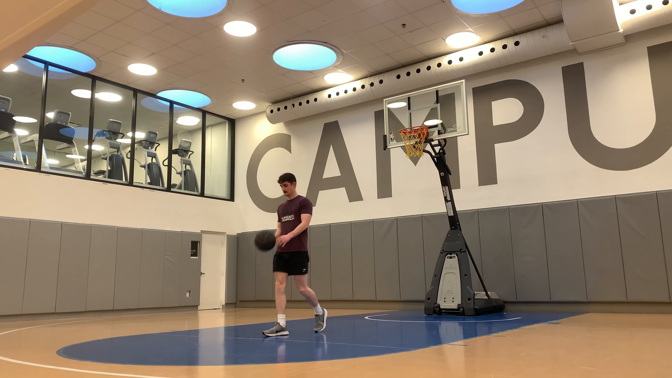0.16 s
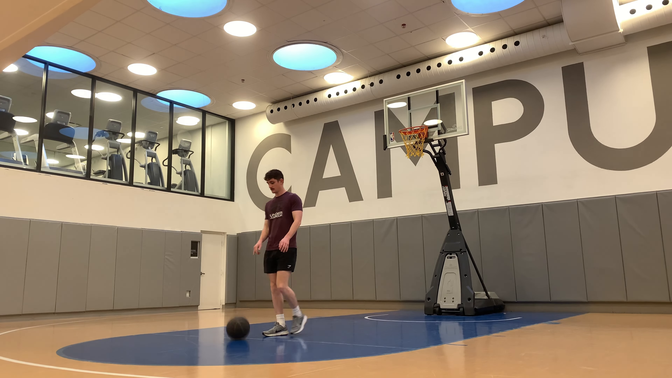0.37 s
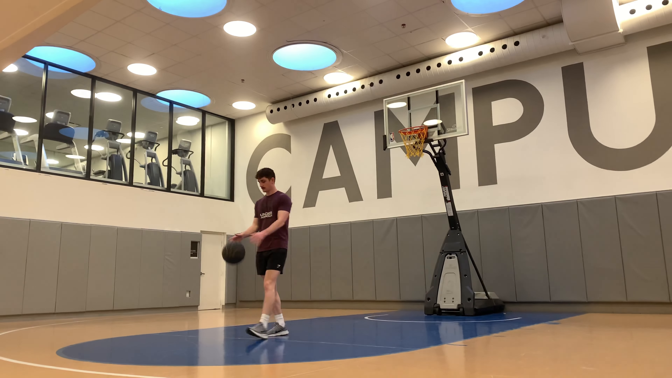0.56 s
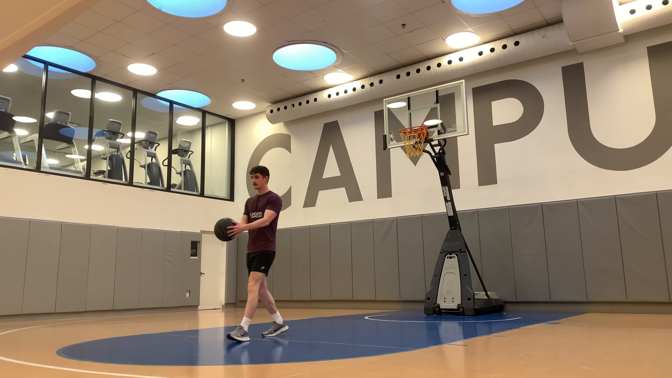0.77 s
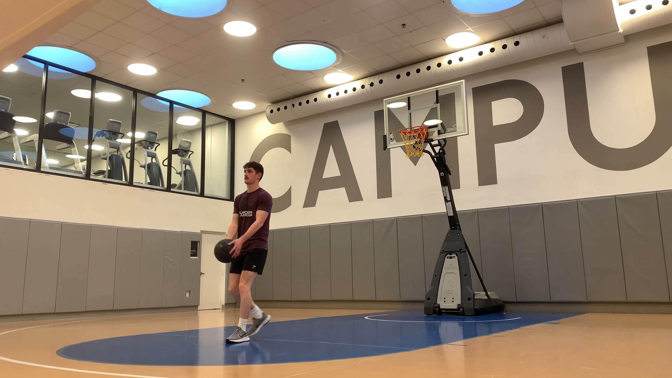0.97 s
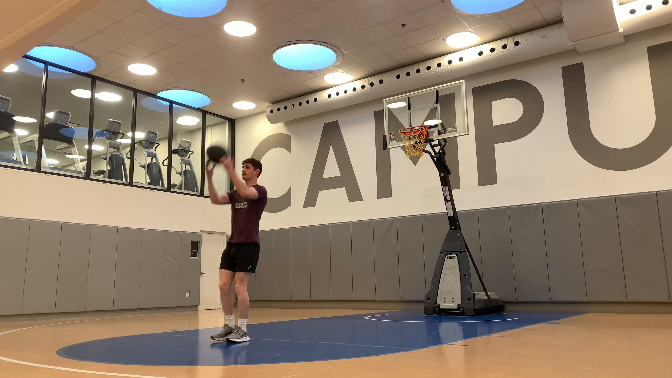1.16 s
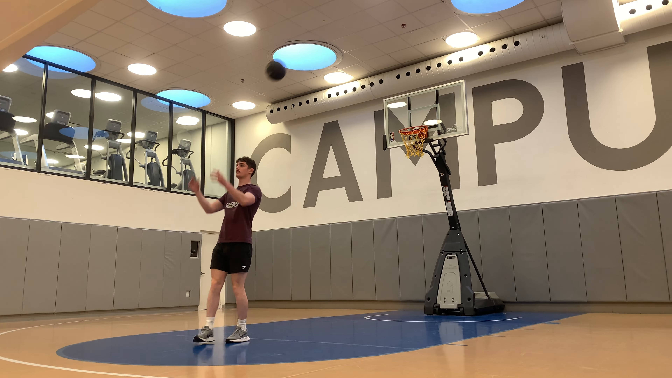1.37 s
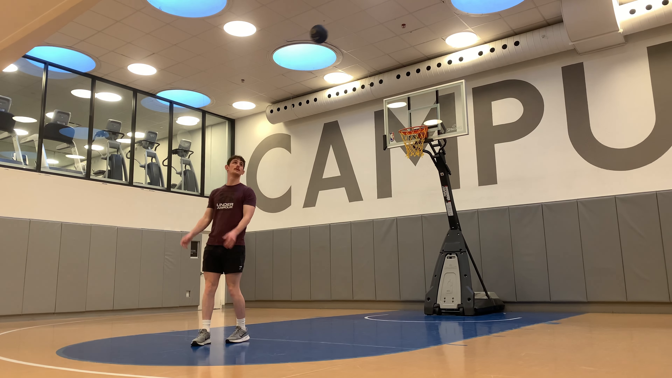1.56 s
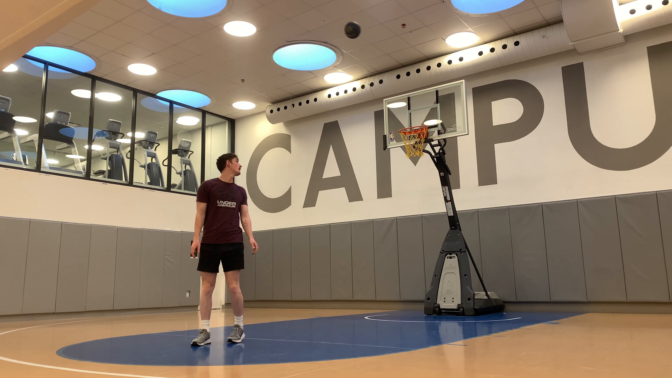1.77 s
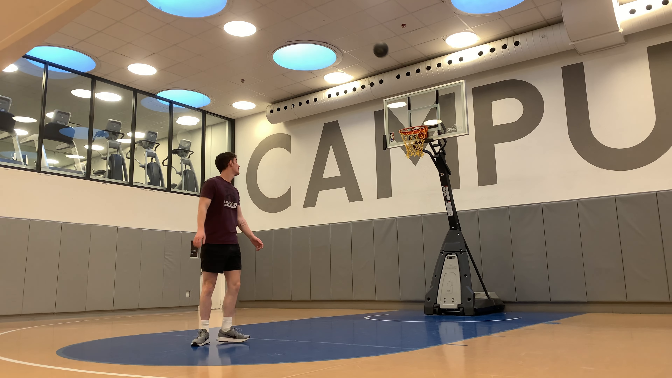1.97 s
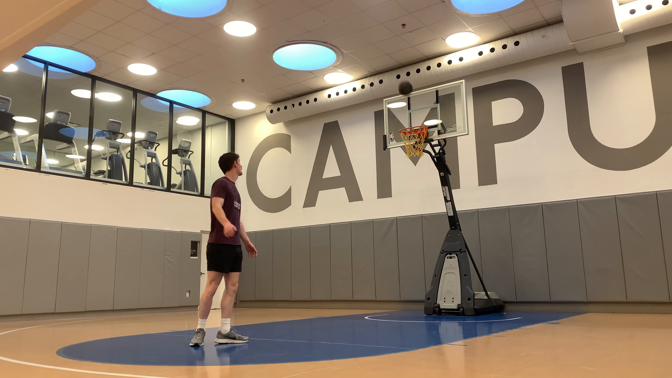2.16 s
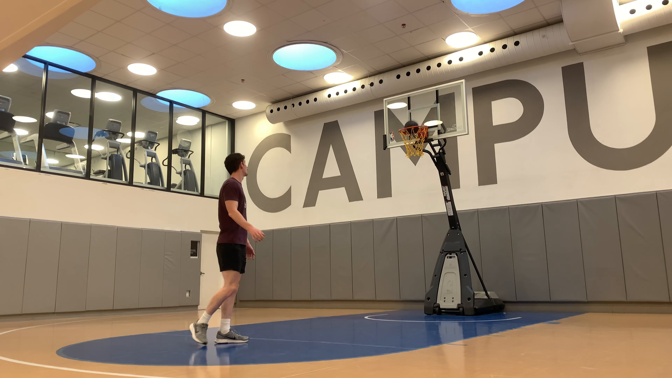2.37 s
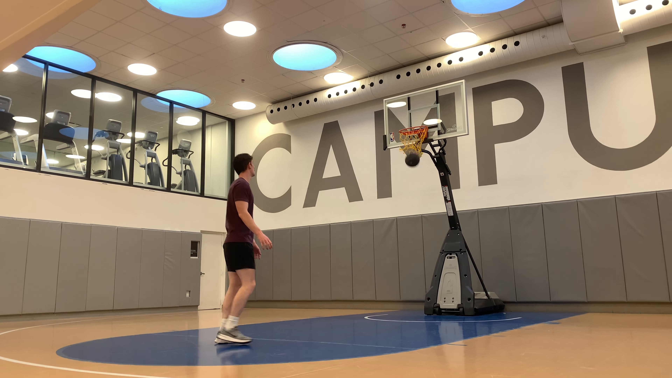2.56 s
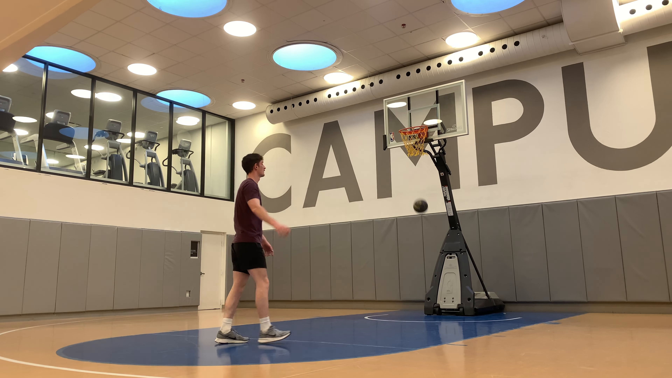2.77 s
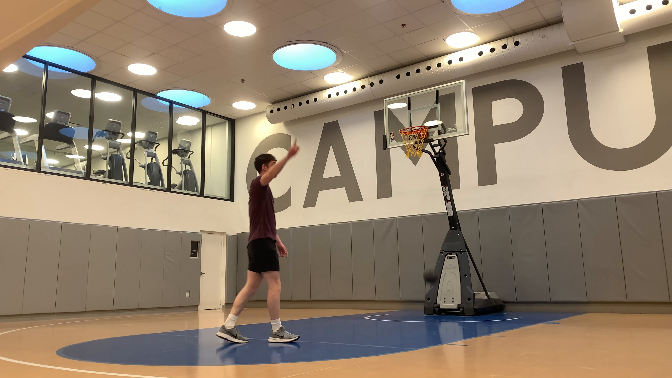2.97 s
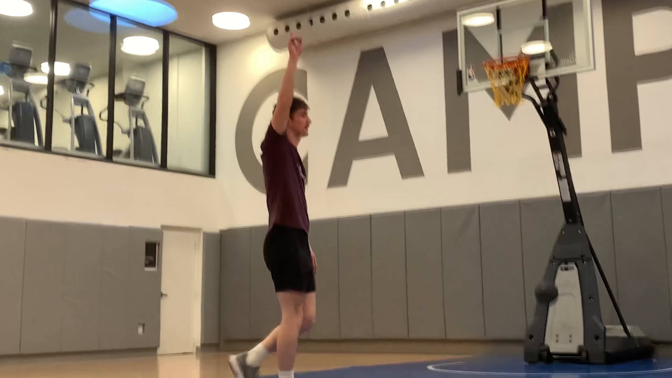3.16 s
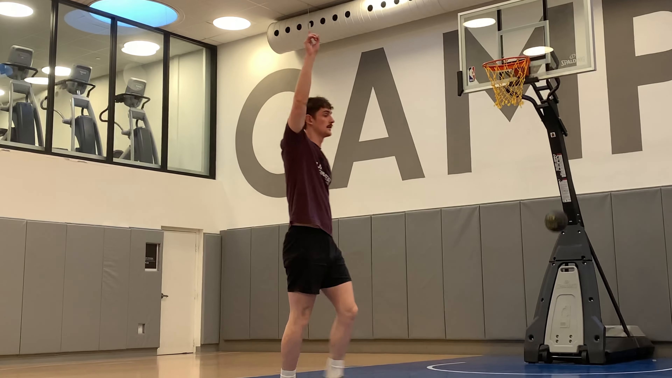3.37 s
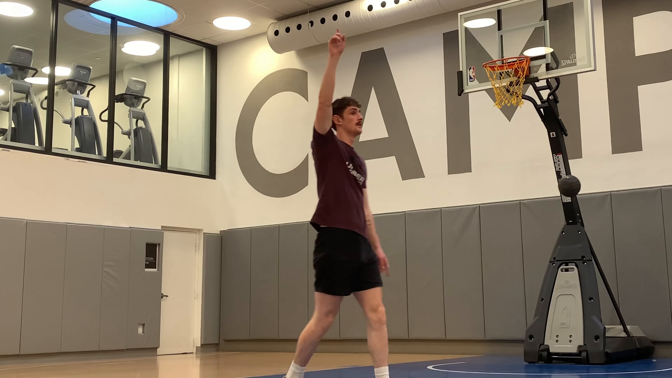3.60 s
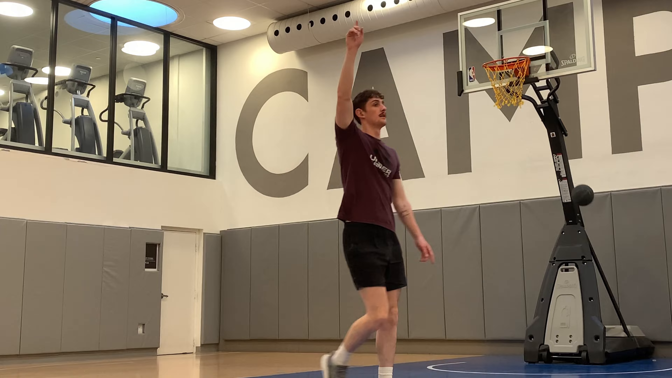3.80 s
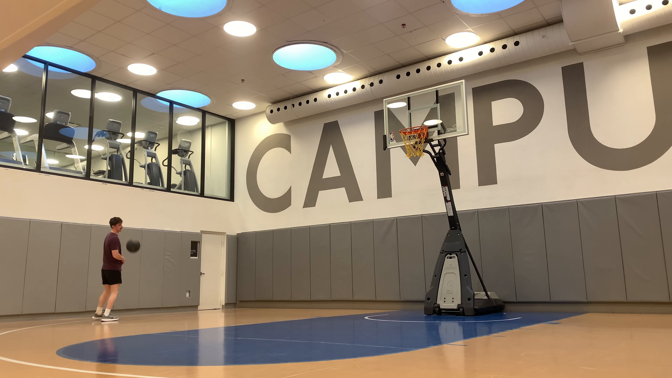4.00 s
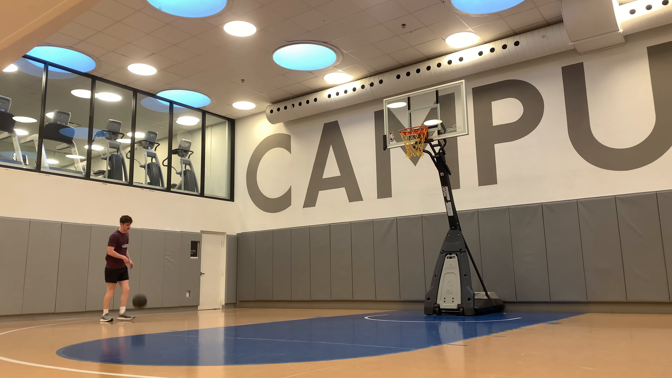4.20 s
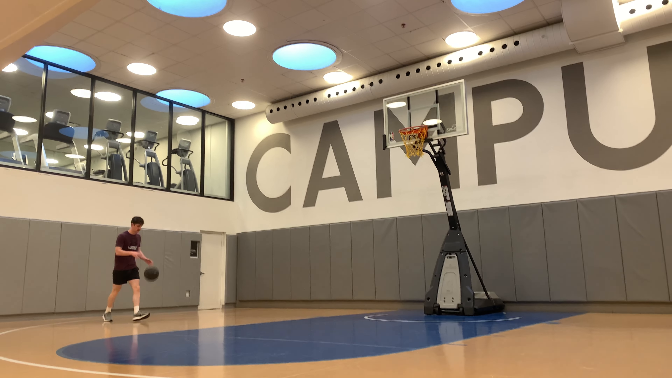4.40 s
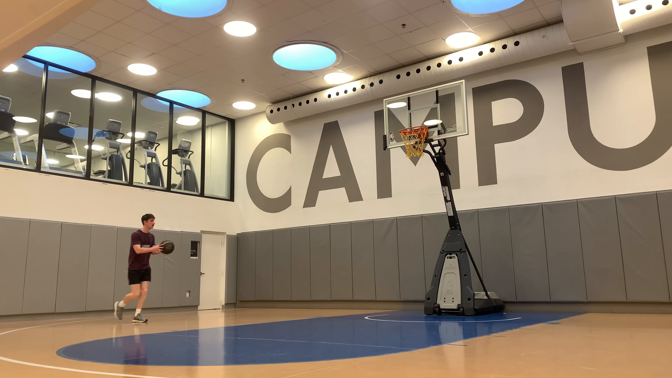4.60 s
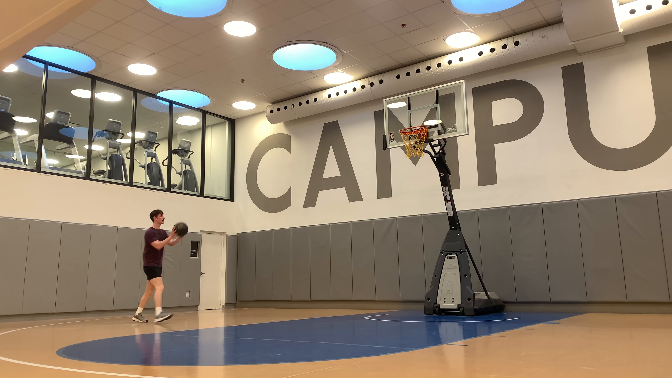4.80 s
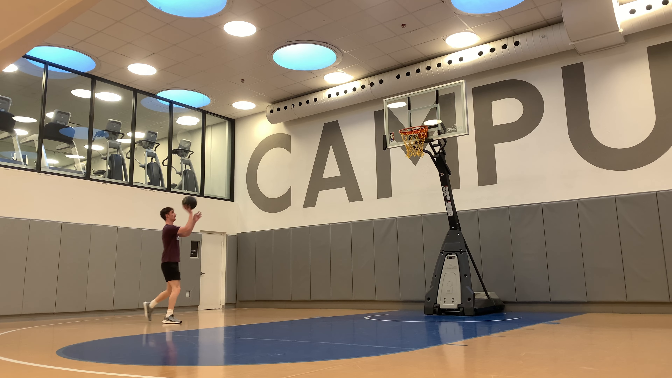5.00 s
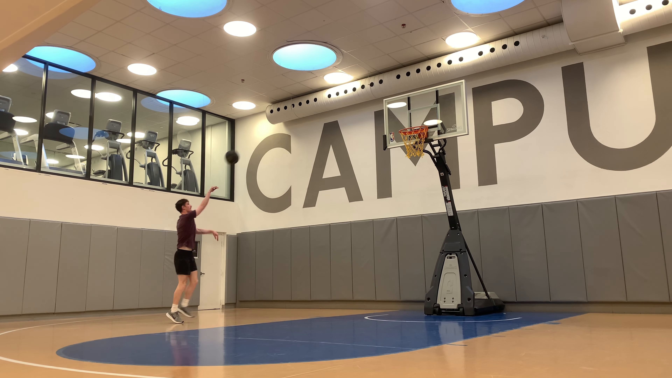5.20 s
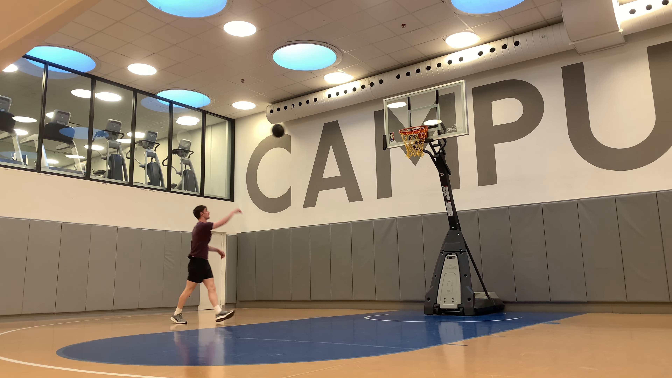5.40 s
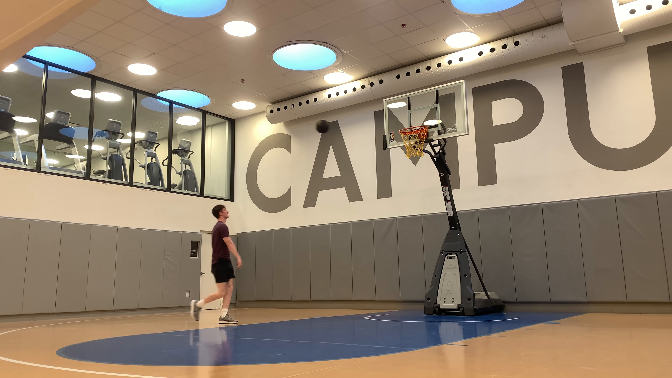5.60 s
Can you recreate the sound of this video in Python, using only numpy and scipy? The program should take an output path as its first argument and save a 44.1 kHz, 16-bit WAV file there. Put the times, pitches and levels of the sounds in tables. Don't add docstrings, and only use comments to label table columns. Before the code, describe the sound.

Stereo phone pickup in a large, hard-walled sports hall with low ventilation rumble. An earlier bounce is still ringing as one dribble slaps the boards; faint shoe taps, a quick clattering run on glass backboard and rim, a tiny net swish, a heavy floor bounce and short shoe squeaks. The scene cuts, echo still hanging, to one more resonant dribble and light foot taps.

```python
import sys
import numpy as np
from scipy import signal
from scipy.fft import rfft, irfft, next_fast_len
from scipy.io import wavfile
from scipy.ndimage import uniform_filter1d

SR = 44100
rng = np.random.default_rng(int(sys.argv[2]) if len(sys.argv) > 2 else 0)


def decibels_to_gain(level_db):
    exponent = np.asarray(level_db, float) / 20
    return 10 ** exponent


def persist_wave(psi):
    counts = np.round(np.clip(psi, -1, 1) * 32767).astype(np.int16)
    wavfile.write(sys.argv[1], SR, np.atleast_2d(counts).T)


N = 249165
TAIL = 2 ** 16
CHANGE_S = 3.935


def colour(points, tilt_db=0.):
    hz, db = np.transpose(points)
    octave = np.log2(np.maximum(np.fft.rfftfreq(4096, 1 / SR), 10))
    level_db = np.interp(octave, np.log2(hz), db) + tilt_db * (octave - 9)
    cepstrum = irfft(np.log(decibels_to_gain(level_db)))
    cepstrum[1:2048] *= 2
    cepstrum[2049:] = 0
    return irfft(np.exp(rfft(cepstrum)))[:2048]


def walk(rate):
    hold = int(SR / rate)
    steps = np.repeat(rng.standard_normal(N // hold + 1), hold)
    return uniform_filter1d(uniform_filter1d(steps, hold), hold)[:N]


def bands(x):
    size = x.shape[-1]
    octave = np.log2(np.fft.rfftfreq(size, 1 / SR) + 1)
    spectrum = rfft(x)
    for centre in np.arange(4.5, 14.5, .5):
        yield 2 ** centre, irfft(spectrum * np.clip(1 - 2 * abs(octave - centre), 0, 1), size)


def hall(delays, metres, wall_db):
    # f/Hz, t60/s, straight sound against tail/dB
    decay = [(41, 1.2, -23.5), (110.8, 1.626, -17), (410, 1.13, -12.5), (1950, 1.367, -15),
             (4435, 1.033, -17.5), (7700, 0.55, -8), (11500, .34, -1), (16100, .13, 3)]
    scatter_s = 0.00039
    build_up_s, build_up_slope = 0.0057, 0.78
    throb, throb_hz, throb_s = 0.89, 70, 0.1218
    t = np.arange(TAIL) / SR
    decay_hz, decay_t60, straight_db = np.transpose(decay)
    straight = colour(np.transpose([decay_hz, straight_db]))

    early = np.zeros(TAIL)
    for s in delays:
        smear = rng.standard_normal(128) * np.exp(-t[:128] / scatter_s)
        smear /= np.sqrt(np.sum(smear ** 2))
        spreading = metres / (metres + 343 * s)
        early[int(SR * s):][:len(smear)] += decibels_to_gain(wall_db) * spreading * smear

    tail = np.zeros((2, TAIL))
    for hz, noise in bands(rng.standard_normal((2, TAIL))):
        t60 = np.interp(np.log(hz), np.log(decay_hz), decay_t60)
        rise = build_up_s * (hz / 1000) ** build_up_slope
        shape = (1 - np.exp(-t / rise)) * np.exp(-np.log(1000) * t / t60)
        depth = throb / (1 + (hz / throb_hz) ** 2)
        shape *= 1 + depth * np.cos(2 * np.pi * (t - .025) / throb_s)
        tail += noise * shape / np.sqrt(np.sum(shape ** 2))
    return straight, tail + signal.fftconvolve(early, straight)[:TAIL]


def heard(dry, room, db, straight_db):
    straight, tail = room
    paths = tail.copy()
    paths[:, :len(straight)] += decibels_to_gain(straight_db) * straight
    wet = signal.fftconvolve(paths, dry[None], axes=1)
    return wet * decibels_to_gain(db) / np.sqrt(np.mean(wet[:, :int(.3 * SR)] ** 2))


def add(out, sound, s, late):
    change = int(CHANGE_S * SR)
    first, last = (change, N) if late else (0, change)
    start = int(round(s * SR))
    a, b = max(start, first), min(start + sound.shape[1], last)
    out[:, a:b] += sound[:, a - start:b - start]


def ring(modes):
    t = np.arange(TAIL // 4) / SR
    tune = 1 + 0.013 * rng.standard_normal(16)
    out = (t == 0).astype(float)
    for (hz, db, t60), k in zip(modes, tune):
        out += decibels_to_gain(db) * np.sin(2 * np.pi * hz * k * t) * np.exp(-np.log(1000) * t / t60)
    return out


def blow(points, modes, tilt_db):
    squash_s, squash_hz = 0.001862, 378
    hit = signal.fftconvolve(colour(points, tilt_db), ring(modes))[:TAIL // 4]
    bins = np.fft.rfftfreq(TAIL // 2, 1 / SR)
    lag = 2 * np.pi * squash_s * squash_hz * np.arctan(bins / squash_hz)
    return -irfft(rfft(hit, TAIL // 2) * np.exp(-1j * lag))[:TAIL // 4]


def ventilation():
    # f/Hz, level/dB per Hz
    rumble = [(13, -78), (22, -25), (40, -8.5), (64, 2), (87, -10.5), (169, -9.5), (205, -11.5),
              (242, -17.5), (356, -14), (510, -22), (710, -24), (1070, -27), (1340, -28), (1710, -36.5),
              (16000, -81.5)]
    # f/Hz, level/dB
    motors = [(59.2, -50.5), (355.3, -61), (1012, -64), (1319, -71)]
    rumble_db, hiss_db, hiss_hz = -44.5, -79, 7000
    noise = signal.fftconvolve(rng.standard_normal((2, 4 * TAIL)), colour(rumble)[None], "same", axes=1)
    swell = 2 * walk(.8)
    out = sum(decibels_to_gain(swell + 0.5 * walk(13)) * part[:, :N] for _, part in bands(noise))
    out *= decibels_to_gain(rumble_db) / np.sqrt(np.mean(out ** 2))
    highpass = signal.butter(2, hiss_hz, "high", fs=SR, output="sos")
    out += decibels_to_gain(hiss_db + swell) * signal.sosfilt(highpass, rng.standard_normal((2, N)))
    t = np.arange(N) / SR
    for hz, db in motors:
        out += decibels_to_gain(db + 0.83 * walk(1.2)) * np.sin(2 * np.pi * hz * t)
    return out


def booms():
    # t/s, peak/dB
    thuds = [
        (0.382, -11),
        (2.308, -7.5),
        (3.075, -21.5),
        (4.28, -10),
    ]
    # first t/s, round trip/s, f/Hz, peak/dB, loss per trip/dB
    returns = [
        (.392, 0.09, 113.8, -7, -4),
        (2.415, 0.06, 118, -18, -3.5),
        (3.087, .062, 105.4, -7.5, -2.5),
        (4.286, .034, 121.5, -9, -3.5),
    ]
    thud_hz, thud_s = 200.7, 0.0082
    boom_s, boom_scatter = .042, .1
    swells = [(s, thud_hz, db, thud_s, 0.) for s, db in thuds]
    for s, trip, hz, db, loss_db in returns:
        for k in range(5):
            pitch = hz * (1 + boom_scatter * rng.standard_normal())
            swells.append((s + k * trip, pitch, db + k * loss_db, boom_s, rng.uniform(0, 2 * np.pi)))
    out = np.zeros(N)
    for s, hz, db, length, turn in swells:
        t = np.arange(int(length * SR)) / SR
        bump = np.sin(np.pi * t / length) * np.sin(2 * np.pi * hz * t + turn)
        out[int(s * SR):][:len(t)] += decibels_to_gain(db) * bump
    return out


def shoe_taps(out, room):
    # t/s, level/dB, straight sound/dB
    taps = [(1.1955, -55, 0), (1.345, -59, -8.5), (1.459, -47.5, 10), (2.006, -44, 10.5), (2.7345, -47, 9),
            (4.9484, -50.5, -2), (5.117, -52.5, 2), (5.2735, -51, -6), (5.4729, -51, -10),
            (5.51, -47.5, 7.5), (5.594, -50, -2)]
    # f/Hz, level/dB per Hz
    shoe = [(40, -8.5), (120, 10.5), (300, -8.5), (700, -14.5), (1500, -5), (2200, -10), (3000, -10.5),
            (5000, -49.5), (9000, -47.5), (16000, -59.5)]
    # f/Hz, level/dB, t60/s
    shoe_modes = [(695, -19, 0.0075), (1390, -26, 0.0043), (2010, -22.5, 0.0009)]
    for s, db, straight_db in taps:
        tap = blow(shoe, shoe_modes, tilt_db=-1.5)
        add(out, heard(tap, room, db, straight_db), s, late=s > CHANGE_S)


def squeak(length, hz, bright_db):
    settled_hz, settling_s, stutter_db = 944, .09, 8
    t = np.arange(int(length * SR)) / SR
    waver = uniform_filter1d(rng.standard_normal(N // 20), size=60)[:len(t)]
    rate = settled_hz + (hz - settled_hz) * np.exp(-t / settling_s)
    phase = 2 * np.pi * np.cumsum(rate * (1 + .3 * waver)) / SR
    tone = np.zeros(len(t))
    for k, db in enumerate([2, -0.5, -1.5, -21.0]):
        partial_db = db + bright_db * min(k, 1)
        tone += decibels_to_gain(partial_db) * np.sin((k + 1) * phase)
    return tone * decibels_to_gain(stutter_db * walk(150)[:len(t)]) * np.sin(np.pi * (t / length) ** .4)


def shoe_squeaks(out, room):
    # t/s, length/s, first slip rate f/Hz, level/dB, overtones/dB
    slips = [(2.039, 0.017, 1110, -68.5, 8), (2.767, 0.015, 1034, -47.5, 6),
             (3.359, 0.037, 1126, -46.5, -9), (3.39, .09, 928, -42.5, -7.5), (3.663, 0.072, 1173, -46, -21),
             (3.667, 0.064, 949.4, -49.5, -2), (3.731, 0.042, 962, -53, -2)]
    for s, length, hz, db, bright_db in slips:
        add(out, heard(squeak(length, hz, bright_db), room, db, straight_db=15.), s, late=False)


def net():
    # f/Hz, level/dB per Hz
    cords = [(200, -37), (650, 3.5), (1100, 10.5), (1500, 1.5), (2000, 4.5), (2500, -1.5), (3200, 0),
             (3800, -12.5), (4400, -6.5), (7000, -24), (11000, -39.5), (16000, -55.5)]
    length_s = 0.052
    u = np.linspace(0, 1, int(length_s * SR))
    grains = rng.standard_normal(N // 20) * decibels_to_gain(2.5 * rng.exponential(size=N // 20))
    return np.convolve(grains[:len(u)] * np.sin(np.pi * u ** 0.26), colour(cords))


def board(tilt_db, ring_db):
    # f/Hz, level/dB per Hz
    glass = [(20, -31.5), (55, -12), (110, 2.5), (240, -0.5), (450, -9), (800, -13.5), (1100, -13),
             (2000, -19.5), (4000, -33), (7500, -40.5), (11000, -54), (16000, -80)]
    # f/Hz, level/dB, t60/s
    glass_modes = [(118, -43, 0.13), (263, -39, 0.067), (430, -42, 0.044), (508, -39.5, 0.036),
                   (697.3, -42, 0.17), (944, -50, 0.29), (1064, -44.5, 0.066), (1175, -41.5, .05),
                   (1450, -42, 0.03), (1800, -53, 0.091), (1985, -38.5, 0.0092)]
    chatter_s, chatter_db, chatter_scatter = .028, -8, .15
    modes = [(hz, db + ring_db, t60) for hz, db, t60 in glass_modes]
    dry = blow(glass, modes, tilt_db)
    for k in (1, 2):
        delay = int(SR * k * chatter_s * (1 + chatter_scatter * rng.standard_normal()))
        dry[delay:] += decibels_to_gain(k * chatter_db) * blow(glass, modes, tilt_db)[:-delay]
    return dry


def backboard_and_rim(out, room):
    # t/s, level/dB, ringing/dB
    contacts = [(2.3045, -23.5, -2.5), (2.354, -31.5, -2.5), (2.43, -33.5, 3.5), (2.455, -27, 5),
                (2.502, -33.5, 2), (2.54, -36, 3.5), (2.58, -42.5, 1.5)]
    first_tilt_db, dulling_db_per_s = 2, 7.5
    for s, db, ring_db in contacts:
        tilt_db = first_tilt_db - dulling_db_per_s * (s - contacts[0][0])
        add(out, heard(board(tilt_db, ring_db), room, db, straight_db=-1), s, late=False)


def ball_bounces(out, rooms):
    # t/s, level/dB, tilt/dB per octave, straight sound/dB
    bounces = [
        (-.45, -16.5, 1.5, -11),
        (0.3801, -20, 2, 7),
        (3.0731, -17, 2, 7),
        (3.449, -23.5, 0, -10),
        (4.2798, -22.5, 2, 5.5),
    ]
    # f/Hz, level/dB per Hz
    ball = [(20, -52.5), (45, -3), (100, -4.5), (150, -4.5), (250, -11), (420, -14.5), (800, -27.5),
            (1100, -20), (1600, -29), (2300, -31), (3500, -32.5), (5000, -41.5), (7500, -47),
            (11000, -57.5), (13500, -52), (16000, -68.5)]
    # f/Hz, level/dB, t60/s
    ball_modes = [(104, -40, 0.11), (144.2, -38, 0.078), (269, -32, 0.016), (440, -39, 0.041),
                  (891, -42.5, 0.12), (1024, -43.5, 0.054), (2333, -66, 0.021), (8050, -13, 0.00051),
                  (9650, 1, 0.00084)]
    for (s, db, tilt_db, straight_db), room in zip(bounces, rooms):
        bounce = blow(ball, ball_modes, tilt_db)
        add(out, heard(bounce, room, db, straight_db), s, late=s > 3.4)


def scene():
    echoes = [
        (.004, .039, .056),
        (0.0028, 0.054, .045),
        (.0215, .0255, .0295),
        (.013, .034, .046),
    ]
    # distance/m, wall gain/dB
    spots = [
        (25.4, -4.5),
        (20, -5),
        (30, 2),
        (25, 2),
    ]
    court, under, far, hoop = (hall(delays, *spot) for delays, spot in zip(echoes, spots))
    out = ventilation()
    out[0] += booms()
    shoe_taps(out, far)
    shoe_squeaks(out, under)
    add(out, heard(net(), hoop, db=-40.5, straight_db=7.1), 2.733, late=False)
    backboard_and_rim(out, hoop)
    ball_bounces(out, (far, court, under, far, far))
    return out


def low_pass(x):
    return signal.sosfilt(signal.butter(12, 16880, fs=SR, output="sos"), x)


def record(dry):
    # f/Hz, likeness/0-1, left minus right/dB
    ports = [(60, .92, -3.2), (200, .93, 0), (400, .85, 1.5), (700, .55, 4.2), (1000, .33, 3.2),
             (5700, .28, -.6), (8300, .98, .3), (16000, .995, 0)]
    # f/Hz, phase/radians
    port_lead = [(0, 0), (500, .5), (6200, 6 * np.pi), (18100, np.pi)]
    top_hz, ceiling = 15300, 1.3
    fade_out_s, fade_in_s = 0.03, 0.044
    size = next_fast_len(N + 512)
    bins = np.fft.rfftfreq(size, 1 / SR)
    hz, like, pan_db = np.transpose(ports)
    like = np.interp(np.log(bins + 1), np.log(hz), like)
    pan_db = np.interp(np.log(bins + 1), np.log(hz), pan_db)
    lead = np.interp(bins, *np.transpose(port_lead))

    shared, other = rfft(dry, size) / (1 + (bins / top_hz) ** 80)
    left = shared * np.exp(.5j * lead) * decibels_to_gain(pan_db / 2)
    right = like * shared + np.sqrt(1 - like ** 2) * other
    right = right * np.exp(-.5j * lead) * decibels_to_gain(-pan_db / 2)
    stereo = irfft(np.array([left, right]), size)[:, :N]
    rounded = ceiling * np.tanh(stereo / ceiling)
    dip = [CHANGE_S - fade_out_s, CHANGE_S, CHANGE_S + fade_in_s]
    fade = np.interp(np.arange(N) / SR, dip, [1, 0, 1])
    return low_pass(fade * rounded)


dry = scene()
out = record(dry)
persist_wave(out)
```